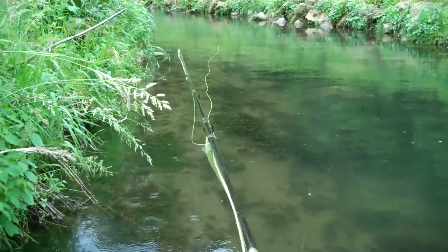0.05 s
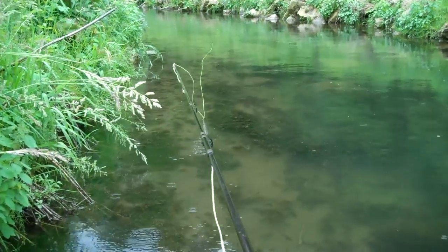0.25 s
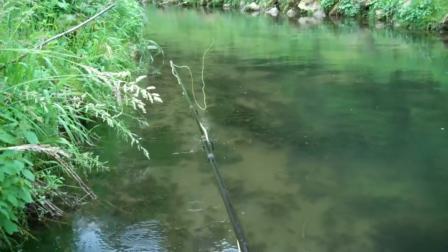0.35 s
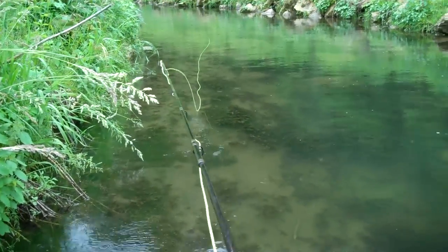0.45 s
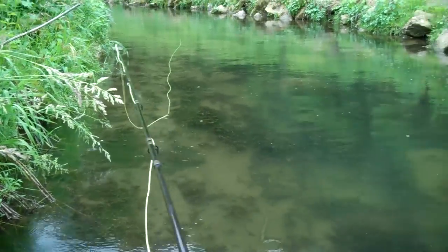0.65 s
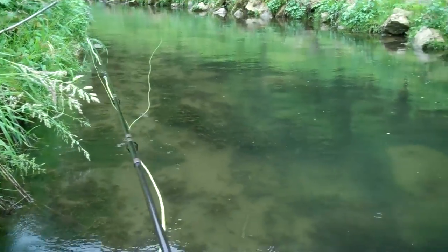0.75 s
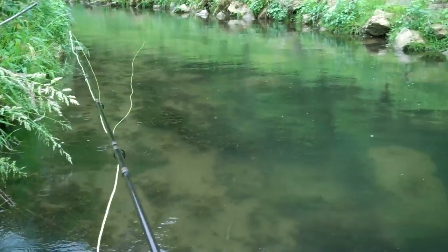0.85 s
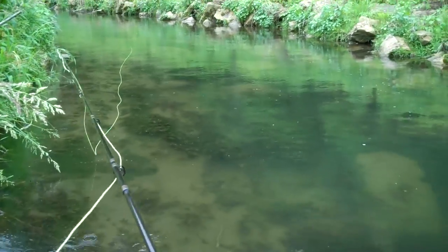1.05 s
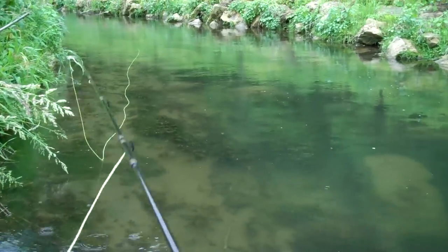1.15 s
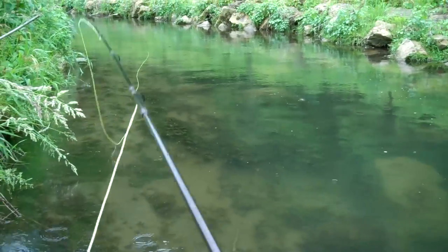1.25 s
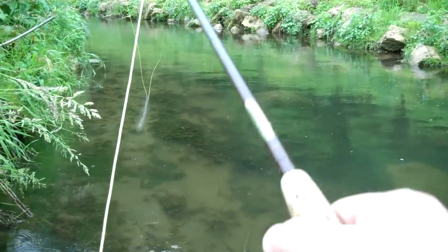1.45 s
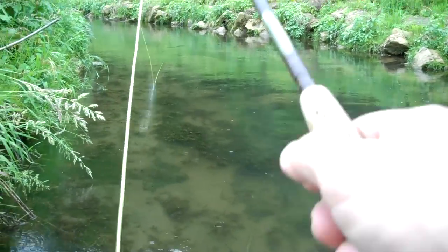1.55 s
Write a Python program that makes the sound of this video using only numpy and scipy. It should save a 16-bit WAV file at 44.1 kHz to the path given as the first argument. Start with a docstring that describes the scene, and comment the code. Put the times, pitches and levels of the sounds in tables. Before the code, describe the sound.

Fishing line sliding and cloth rustling close by, with a sharp click over a soft creek.

```python
"""A sleeve rustles and a fishing line hisses over the soft wash of a slow creek, with one sharp click.
An angler is lifting a rod close by: cloth rubs, and the line slides through the rod's guide rings
and whistles when taut. The click is a knock of the tackle; a few drips and a faint hum lie behind.
The two microphone ports (small openings) each ring at their own treble pitch."""
import sys
import numpy as np
from scipy import signal
from scipy.fft import rfft, irfft
from scipy.io import wavfile
from scipy.ndimage import uniform_filter1d

SR = 44100
rng = np.random.default_rng(int(sys.argv[2]) if len(sys.argv) > 2 else 0)


def generate_wav(sig):
    """Save sig (samples, or channels by samples) to the path in sys.argv[1] as 16-bit PCM at SR."""
    pcm = np.round(np.clip(np.atleast_2d(sig).T, -1, 1) * 32767).astype(np.int16)
    wavfile.write(sys.argv[1], SR, pcm)


N = 70560
TIME = np.arange(N) / SR


def amp(db):
    """Turns decibels into a gain."""
    return 10 ** (np.asarray(db) / 20)


def unit(x):
    """Scales a sound to an average power of 1."""
    return x / np.sqrt(np.mean(x ** 2) + 1e-20)


def pan(db):
    """Left and right gains that make the left side db louder."""
    return amp(np.array([[.5], [-.5]]) * db)


def at_hz(table, hz):
    """Reads between a table's rows on a logarithmic frequency scale."""
    f, value = np.transpose(table)
    return np.interp(np.log(hz + 1), np.log(f + 1), value)


def over_time(table):
    """Joins a table's timed points with straight lines."""
    return np.interp(TIME, *np.transpose(table))


def arch(start, length):
    """A smooth rise and fall."""
    return np.sin(np.pi * np.clip((TIME - start) / length, 0, 1))


def add(mix, start, sound):
    """Mixes a sound in at a time in seconds."""
    part = mix[max(round(start * SR), 0):][:len(sound)]
    part += sound[:len(part)]


def colour(x, spectrum):
    """Sets a sound's balance of bass and treble, at an average power of 1."""
    gain = amp(at_hz(spectrum, np.fft.rfftfreq(N, 1 / SR)))
    return unit(irfft(rfft(x) * gain, N))


def noise(spectrum, patchy_db, flicker_db):
    """Stereo noise with drifting louder patches and a quick flicker across wide bands."""
    # how alike left and right are: f/Hz, correlation (1 = the same)
    likeness = [(20, 0.025), (150, 0.84), (370, 1), (700, 0.83), (1300, 0.56), (2300, .45), (4000, 0.12),
                (6000, 0), (14000, 0)]
    hz = np.fft.rfftfreq(512, 1 / SR)
    shape = (N // 128 + 5, len(hz))  # time steps, frequencies
    a, b, c, d, slow, fast = (rng.standard_normal(shape) for _ in range(6))
    patches = unit(uniform_filter1d(uniform_filter1d(slow, size=14, axis=0), size=6, axis=1))
    flicker = unit(uniform_filter1d(uniform_filter1d(fast, size=3, axis=0), size=70, axis=1))
    same = np.clip(at_hz(likeness, hz), -1, 1)
    left = a + 1j * b
    right = same * left + np.sqrt(1 - same ** 2) * (c + 1j * d)
    grid = np.array([left, right]) * amp(patchy_db * patches + flicker_db * flicker)
    white = signal.istft(grid, nperseg=512, noverlap=384, time_axis=1, freq_axis=2)[1][:, :N]
    return colour(white, spectrum)


def friction(spectrum, slips_per_s, slips_db, patchy_db, flicker_db):
    """Many sliding fibres blur into a hiss, with single slips standing out."""
    slips = (rng.random(N) < slips_per_s / SR) * rng.standard_normal((2, N))
    return unit(noise(spectrum, patchy_db, flicker_db) + amp(slips_db) * colour(slips, spectrum))


def bubble(hz, t60):
    """A tone that fades by 60 dB in t60 seconds and rises as the bubble nears the surface."""
    t = np.arange(0, t60, 1 / SR)
    return amp(-60 * t / t60) * np.sin(2 * np.pi * hz * t * (1 + 0.051 * t / t60))


def creek():
    """Running water makes a soft wash, with small bubbles ringing all around."""
    # tone of the wash: f/Hz, relative level/dB
    wash_tone = [(20, -20), (70, -19), (150, -4.5), (350, 0), (700, -1.5), (1600, 0), (3000, -17.5),
                 (6000, -12.5), (10000, -18.5), (14000, -5.5)]
    bubbles_per_s, sizes, ring_cycles = 70, 24, 36
    bubbles = np.zeros((2, N))
    for hz in np.geomspace(400, 3500, sizes):
        pops = (rng.random(N) < bubbles_per_s / sizes / SR) * rng.uniform(.3, 1, N)
        left_share = rng.uniform(.2, .8)
        ringing = signal.oaconvolve(pops, bubble(hz, ring_cycles / hz))[:N]
        bubbles += np.sqrt([[left_share], [1 - left_share]]) * ringing
    return amp(-52.5) * noise(wash_tone, patchy_db=2, flicker_db=1) + amp(-65) * unit(bubbles)


def hum(hz=95):
    """A faint, wavering, distant drone."""
    waver = unit(uniform_filter1d(rng.standard_normal(N), size=4000))
    pitch = hz * (1 + 0.033 * waver)
    return amp(-79.5) * unit(np.sin(2 * np.pi * np.cumsum(pitch) / SR))


def sleeve():
    """Cloth rubs as the arm moves, flaps softly where it folds and drags as the arm lifts."""
    # tone of the rub, flaps and drag: f/Hz, relative level/dB
    rub_tone = [(30, -47), (150, -17), (400, 2.5), (1000, -1.5), (1700, 2.5), (2600, 0), (3500, -4),
                (5000, -6.5), (8000, -3), (14000, -2)]
    flap_tone = [(30, -35), (120, -18.5), (250, -2), (400, -3), (650, 0), (1200, -5), (2500, -42),
                 (14000, -42)]
    drag_tone = [(30, -42), (250, -6.5), (480, -10), (660, 1.5), (900, -6), (2000, -36), (14000, -39)]
    # loudness of the rub: t/s, level/dB
    rub_level = [(0, -40.5), (.03, -43), (.085, -54), (.15, -45), (.25, -45), (.32, -44), (.39, -54.5),
                 (.49, -51.5), (.6, -46.5), (.65, -44), (.72, -42), (.78, -39.5), (.815, -42), (.95, -46),
                 (1.06, -47), (1.13, -50), (1.19, -61.5), (1.25, -59.5), (1.3, -48), (1.45, -49),
                 (1.6, -48)]
    # each flap and drag: t/s, length/s, level/dB
    flaps = [(-.03, 0.14, -53), (0.243, 0.031, -52), (0.326, 0.037, -50), (.63, .045, -47),
             (0.681, 0.043, -50), (0.773, 0.028, -49), (0.811, 0.41, -57), (1.306, 0.043, -63)]
    drags = [(1.375, 0.24, -54.5)]
    rub = friction(rub_tone, slips_per_s=700, slips_db=-8, patchy_db=1.5, flicker_db=1.2)
    flap = noise(flap_tone, patchy_db=2.5, flicker_db=-2.5)
    drag = noise(drag_tone, patchy_db=1.5, flicker_db=-0.5)
    rub *= amp(over_time(rub_level))
    flap *= sum(amp(db) * arch(start, length) for start, length, db in flaps)
    drag *= sum(amp(db) * arch(start, length) for start, length, db in drags)
    return rub + flap + pan(-8) * drag


def line_hiss():
    """The line hisses as it slides through the guide rings."""
    # tone of the hiss: f/Hz, relative level/dB
    hiss_tone = [(30, -32), (1500, -24), (3000, -9.5), (4300, -8.5), (5400, -1), (6300, 4), (7100, -0.5),
                 (8000, -10.5), (9500, -22), (14000, -20.5)]
    # loudness of the hiss: t/s, level/dB
    hiss_level = [(0, -42.5), (.035, -46), (.085, -54), (.14, -48.5), (.21, -48), (.27, -40.5),
                  (.33, -38.5), (.375, -41.5), (.392, -44), (.425, -41), (.485, -54), (.55, -50),
                  (.59, -50), (.64, -46.5), (.71, -53.5), (.76, -46), (.83, -52.5), (.89, -47.5),
                  (1.05, -50), (1.22, -56.5), (1.28, -45), (1.33, -46.5), (1.41, -43.5), (1.46, -45.5),
                  (1.53, -42), (1.6, -44)]
    hiss = friction(hiss_tone, slips_per_s=700, slips_db=-6.5, patchy_db=3.5, flicker_db=0.4)
    return amp(over_time(hiss_level)) * hiss


def line_whistles(sag=0.03):
    """The taut line whistles: a narrow band of noise that sinks in pitch."""
    # each whistle: t/s, length/s, middle f/Hz, width/Hz, level/dB
    whistles = [(0.098, 0.22, 7730, 400, -58), (1.018, 0.052, 6450, 50, -51.5),
                (1.098, 0.11, 7770, 260, -54), (1.151, .09, 6320, 260, -51.5), (1.2, .09, 7550, 300, -58)]
    offset_hz = np.fft.fftfreq(N, 1 / SR)
    out = np.zeros((2, N))
    for start, length, hz, width, db in whistles:
        pitch = hz * (1 - sag * np.clip(2 * (TIME - start) / length - 1, -1, 1))
        band = np.fft.fft(rng.standard_normal((2, N))) / (1 + (2 * offset_hz / width) ** 2)
        fuzz = np.fft.ifft(band * np.exp(2j * np.pi * rng.random(N)))
        whistle = (fuzz * np.exp(2j * np.pi * np.cumsum(pitch) / SR)).real  # moves the band up to pitch
        out += amp(db) * arch(start, length) * unit(whistle)
    return out


def tackle():
    """Hard knocks give a tiny push of air and a high ring; rod and body scatter a brief echo."""
    # each knock: t/s, relative level/dB
    clicks = [(0.2189, -26.5), (0.223, 1.5), (0.227, -17), (0.3274, -29), (0.4185, -29.5)]
    # ringing tones of the tackle: f/Hz, relative level/dB, time to fade 60 dB/s, left minus right/dB
    tones = [(2180, -22.5, 0.0042, 5), (2690, -13.5, 0.0043, 0), (4170, -21.5, .008, 4),
             (5160, -21.5, .009, 10), (5890, -5, 0.0056, -1.5), (7263, -6.5, 0.0052, -0.5),
             (7726, -8.5, 0.0041, 4.5), (8670, -6.5, 0.0043, -1), (11220, -13.5, 0.0047, 3.5),
             (13380, -14, 0.0037, 11.5)]
    rise_s, push_s, echo_t60_s = 0.00016, 0.00008, 0.023
    t, knocks = TIME[:SR // 10], np.zeros((2, N))
    ring = sum(pan(side_db) * amp(db - 60 * t / t60) * np.sin(2 * np.pi * hz * t)
               for hz, db, t60, side_db in tones)
    ring *= 1 - np.exp(-t / rise_s)
    ring = signal.sosfilt(signal.butter(2, 1400, "high", fs=SR, output="sos"), ring)
    push = pan(19.5) * amp(-23.5) * t / push_s * np.exp(-t / push_s)
    for start, db in clicks:
        for channel, sound in zip(knocks, ring + push):
            add(channel, start, amp(db + 0.5) * sound)
    echo = rng.standard_normal((2, len(t))) * amp(-60 * t / echo_t60_s) * (t > .003)
    echo = amp(-11) * unit(echo) / np.sqrt(len(t))
    echo = signal.sosfilt(signal.butter(2, 6000, fs=SR, output="sos"), echo)
    return knocks + signal.oaconvolve(knocks, echo, axes=1)[:, :N]


def drips():
    """A few drops land on the water nearby, each ringing as a bubble."""
    # each drop: t/s, f/Hz, level/dB, time to fade 60 dB/s
    drops = [(.283, 1840, -31, 0.0029), (.709, 1580, -35, 0.01), (1.199, 580, -50.5, 0.057),
             (1.587, 1190, -36.5, 0.0073)]
    out = np.zeros(N)
    for start, hz, db, t60 in drops:
        add(out, start, amp(db) * bubble(hz, t60))
    return out


def scene():
    """Water, angler and tackle together; sleeve and line move from side to side with the hand."""
    # where the hand is: t/s, left minus right/dB
    hand_side = [(0, 1.5), (.3, 1.5), (.45, -0.5), (.72, 2), (.9, -3), (1.15, -1.5), (1.35, -1), (1.6, -.5)]
    hand = pan(over_time(hand_side))
    return creek() + hum() + hand * (sleeve() + line_hiss() + line_whistles()) + tackle() + drips()


def port(x, response):
    """A microphone's opening boosts some pitches and dulls others."""
    log_gain = np.log(amp(at_hz(response, abs(np.fft.fftfreq(4096, 1 / SR)))))
    ring = np.fft.ifft(np.exp(np.conj(signal.hilbert(log_gain)))).real  # rings only after a sound
    return signal.oaconvolve(x, ring[:len(ring) // 2])[:N]


def record(dry):
    """The two ports ring, peaks clip at full scale and the highest treble is cut."""
    # boost or cut of the ports: f/Hz, left/dB, right/dB
    ports = [(19.8, 3.5, -2), (500, -3.5, -2), (1980, 2.5, 2.5), (4300, 6.5, 7), (5620, 4, 6.5),
             (6220, 3, 2), (6520, 3.5, 1.5), (7430, 12.5, -6), (8240, 7, -3.5), (9310, 1.5, -11),
             (10900, -2.5, -12.5), (13200, -6.5, -17.5)]
    left = port(dry[0], [(hz, db) for hz, db, _ in ports])
    right = port(dry[1], [(hz, db) for hz, _, db in ports])
    lowpass = signal.firwin(511, cutoff=14250, window=("kaiser", 9), fs=SR)
    return signal.oaconvolve(np.clip([left, right], -1, 1), lowpass[None], "same")


dry = scene()
out = record(dry)
generate_wav(out)
```